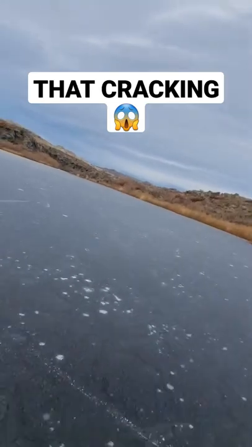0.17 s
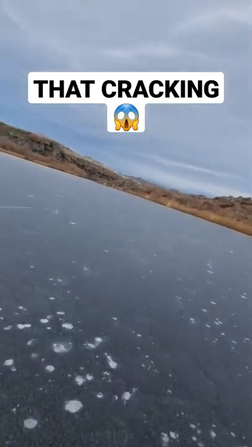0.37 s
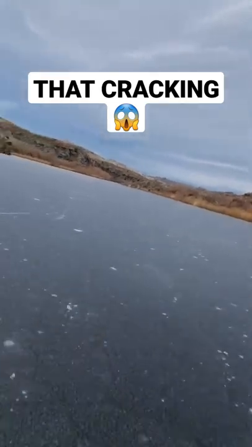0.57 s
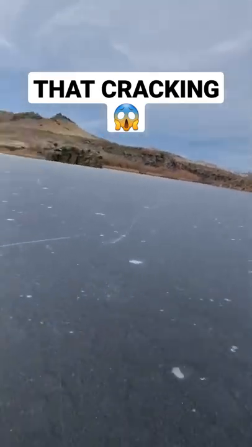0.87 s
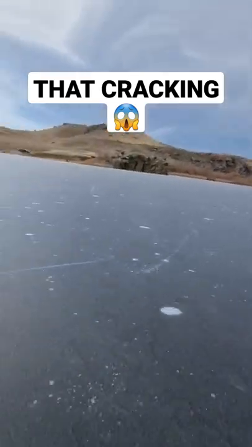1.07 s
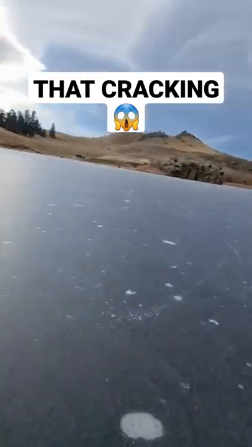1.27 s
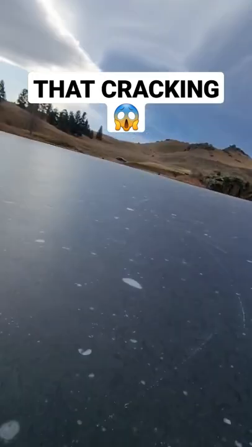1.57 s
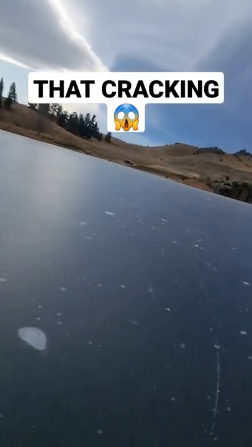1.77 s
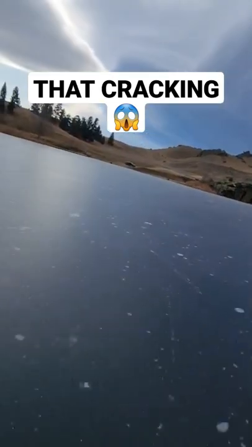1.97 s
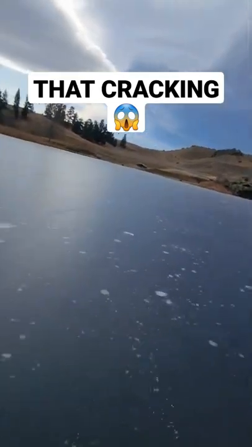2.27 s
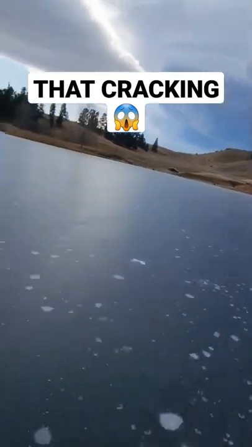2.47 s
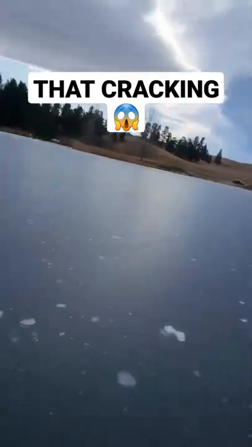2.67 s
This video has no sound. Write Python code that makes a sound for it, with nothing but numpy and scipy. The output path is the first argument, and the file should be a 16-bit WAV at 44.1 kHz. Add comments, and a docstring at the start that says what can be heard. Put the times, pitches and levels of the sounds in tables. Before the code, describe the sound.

Skate blades scrape over thin lake ice, making it rumble, ring and knock. Two sharp cracks come early and another later, followed by a rasping push-off. Low wind gusts hit the close microphone in the open air.

```python
"""Skate blades gliding over thin lake ice, heard in the open from a hand-held stereo microphone.
The blades bump over the surface and set the ice sheet rumbling, ringing and knocking, while their
edges shave off a gritty hiss, sizzle briefly and chatter on the push-offs.
The sheet snaps sharply under the skater and splinters on; wind buffets the two microphone ports."""
import sys
import numpy as np
from scipy import signal
from scipy.fft import rfft, irfft
from scipy.io import wavfile
from scipy.ndimage import map_coordinates

SR = 44100
rng = np.random.default_rng(int(sys.argv[2]) if len(sys.argv) > 2 else 0)


def generate_wav(signal):
    """Clip the signal to [-1, 1] and save it as 16-bit WAV at the path in sys.argv[1]."""
    frames = np.transpose(np.atleast_2d(signal))
    scaled = np.clip(frames, -1, 1) * 32767
    pcm = np.round(scaled).astype(np.int16)
    wavfile.write(sys.argv[1], SR, pcm)


N = 123921
TIME = np.arange(N) / SR
FFT_SIZE = 2 ** 17
HZ = np.maximum(np.arange(FFT_SIZE // 2 + 1) * SR / FFT_SIZE, 1)
GRIT_LAG_S = 0.000311   # scraping and splintering reach the left port this much later

# spectrum of shaved ice: (frequency [Hz], relative level [dB])
SHAVING_SPECTRUM = [(400, -41.5), (1100, -5), (1900, 6.5), (2900, -1.5), (4000, -0.5), (4700, -3),
                    (5900, -1), (7300, 1.5), (8700, -10.5), (10300, -12), (11700, -10.5), (14000, -10.5),
                    (16000, -22)]


def from_db(db):
    """Decibels to gain."""
    return 10 ** (np.asarray(db) / 20)


def unit_power(x):
    """Scale to unit power."""
    return x / np.sqrt(np.mean(x ** 2) + 1e-20)


def in_time(rows):
    """Level columns of a table as gains, sample by sample."""
    times, *columns = np.transpose(rows)
    return [from_db(np.interp(TIME, times, db)) for db in columns]


def per_hz(points):
    """A table of (frequency [Hz], level [dB]) on the frequency grid."""
    hz, db = np.transpose(points)
    return np.interp(np.log(HZ), np.log(hz), db)


def colour(x, db, lag_s=0, sweep_s=0):
    """Causal filter with a delay and the ice's dispersion: lows trail highs, by sweep_s at 1 kHz."""
    cepstrum = irfft(np.log(from_db(db)))
    cepstrum[1:FFT_SIZE // 2] *= 2   # folded for minimum phase
    cepstrum[FFT_SIZE // 2 + 1:] = 0
    turns = HZ * lag_s + 2 * sweep_s * np.sqrt(1000 * HZ)
    return irfft(rfft(x, FFT_SIZE) * np.exp(rfft(cepstrum) - 2j * np.pi * turns))[..., :N]


def high_pass(x, hz, order):
    """Thin out the lows."""
    return signal.sosfilt(signal.butter(order, hz, "high", fs=SR, output="sos"), x)


def ports(pair, db=0, left_lag_s=0):
    """Colour a left-right pair at the microphone; the right port hears more of it."""
    # right port over left port: (frequency [Hz], level [dB])
    right_bias = [(50, 1.5), (120, 11), (250, 5.5), (600, 5.5), (1200, 1.5), (2300, 1), (4200, 8),
                  (8000, 10), (15000, 8.5)]
    bias = per_hz(right_bias) / 2
    return np.array([colour(pair[0], db - bias, left_lag_s), colour(pair[1], db + bias)])


def wander(x, depth_db, low_hz, high_hz, bands):
    """Narrow bands swell and sink, each on its own; unit power."""
    shifts_per_s = 30
    spectrum, out = rfft(x, FFT_SIZE), 0
    place = np.interp(np.log(HZ), np.log([low_hz, high_hz]), [0, bands - 1])
    for k, drift in enumerate(rng.standard_normal((bands, 400))):
        gain = from_db(depth_db * np.interp(TIME * shifts_per_s, np.arange(len(drift)), drift))
        band = irfft(spectrum * np.maximum(1 - np.abs(place - k), 0))[:, :N]
        out += gain * band
    return unit_power(out)


def click(at):
    """A unit click at the given time."""
    return 1.0 * (np.arange(N) == int(at * SR))


def fade(at, decay_s):
    """An envelope that starts at once and dies away."""
    return (TIME >= at) * np.exp(-np.clip((TIME - at) / decay_s, 0, 50))


def tails(clicks, decay_s):
    """Give every click an exponential tail."""
    return signal.lfilter([1], [1, -np.exp(-1 / (decay_s * SR))], clicks + 1e-18)


def contacts(per_s, spread_db):
    """Random clicks, mostly small, a few large."""
    hits = rng.random(N) < per_s / SR
    return hits * from_db(spread_db * np.minimum(rng.exponential(1, N), 4))


def grit(per_s, spread_db, share):
    """Tiny bursts of breaking ice carry a share of the power; the rest is smooth hiss."""
    power = tails(contacts(per_s, spread_db) ** 2, decay_s=0.0015)
    likeness = 0.077   # share of the power common to both ports
    common = np.sqrt(likeness) * rng.standard_normal(N)
    separate = np.sqrt(1 - likeness) * rng.standard_normal((2, N))
    return np.sqrt(1 - share + share * power / power.mean()) * (common + separate)


def shaken_sheet(spectrum, likeness):
    """Bumps under the blades shake the ice sheet; the ports hear them in opposite phase."""
    bumps = unit_power(contacts(per_s=1000, spread_db=3.5) * rng.choice([-1, 1], N))
    opposed = np.sqrt(likeness) * bumps * [[-1], [1]]
    separate = np.sqrt(1 - likeness) * rng.standard_normal((2, N))
    shaking = ports(opposed + separate, per_hz(spectrum))
    return wander(shaking, depth_db=3.5, low_hz=203, high_hz=2150, bands=14)


def rumble():
    """The low, broad sound of the sheet under the gliding blades."""
    # spectrum of the rumbling sheet: (frequency [Hz], relative level [dB])
    spectrum = [(60, -21), (150, -9), (260, -4.5), (400, 0), (600, -3), (800, -6.5), (1100, -15.5),
                (1600, -11.5), (2600, -34), (6000, -73)]
    return shaken_sheet(spectrum, likeness=0.68)


def hollow_ring():
    """The sheet's main resonance shifts as the skater crosses ice of changing thickness."""
    # the resonance before it shifts: (frequency [Hz], relative level [dB])
    spectrum = [(400, -26.5), (750, -2), (950, -1), (1100, 2.5), (1300, 0), (1550, -7), (1900, -21.5),
                (2800, -19), (6000, -51)]
    # path of the resonance: (time [s], centre [Hz])
    ring_pitch = [(0.0, 1098), (0.32, 1165), (0.6, 1082), (1.13, 1167), (1.3, 884), (1.55, 1021),
                  (1.72, 897), (2.05, 1150), (2.75, 1296)]
    unshifted_hz = 1150
    position = np.cumsum(np.interp(TIME, *np.transpose(ring_pitch)) / unshifted_hz)
    ring = shaken_sheet(spectrum, likeness=0.93)
    return np.array([map_coordinates(port, [position], order=3, mode="mirror") for port in ring])


def edge_hiss():
    """The steel edges shave the surface; the colour wanders as the blades move."""
    shavings = grit(per_s=1300, spread_db=3.2, share=0.66)
    hiss = ports(shavings, per_hz(SHAVING_SPECTRUM), GRIT_LAG_S)
    return wander(hiss, depth_db=3, low_hz=1760, high_hz=14100, bands=20)


def wind():
    """Lumpy low turbulence, separate at each port; single eddies swell and sink."""
    # gusts on the microphone: (time [s], relative level [dB])
    gusts = [(0.0, -38), (0.23, -36.5), (0.3, -26), (0.37, -38.5), (0.74, -32.5), (0.93, -37.5),
             (1.04, -34.5), (1.11, -37), (1.18, -33), (1.26, -36.5), (1.6, -34.5), (1.82, -29), (1.88, -36),
             (2.09, -26), (2.16, -32), (2.27, -27.5), (2.37, -32.5), (2.47, -32.5), (2.66, -36.5),
             (2.72, -28.5), (2.81, -36.5)]
    # spectrum of the buffeting: (frequency [Hz], relative level [dB])
    spectrum = [(15, -9), (32, -12), (48, -1), (72, -0.5), (100, -5.5), (160, -12.5), (300, -18),
                (1000, -71.5)]
    strength, = in_time(gusts)
    turbulence = ports(rng.standard_normal((2, N)), per_hz(spectrum))
    return from_db(1.5) * strength * wander(turbulence, depth_db=1, low_hz=80, high_hz=216, bands=3)


def cracks():
    """Each crack is a sharp, dispersed snap and a thin crunch in a short spray of splinters."""
    # the sheet breaks: (time [s], relative snap level [dB], splinter level [dB],
    # snap's low edge [Hz], snap's extra level on the right [dB])
    breaks = [(0.1442, -11, -43, 2520, 0), (0.1482, 3.5, -27, 447, -2), (0.2205, -13.5, -42, 1500, 3.5),
              (0.8006, -27, -40.5, 4000, 4.5), (0.8507, 6, -26.5, 361.4, -4.5),
              (1.1653, -17.5, -57, 1500, -10), (1.8861, -11, -41.5, 3000, 4), (1.891, -1.5, -27.5, 766, 1),
              (1.955, -18, -32, 2997, 1), (2.1395, -21, -52, 5000, 8), (2.1757, -12, -32, 3600, 8.5),
              (2.3672, -17, -46, 5000, 13), (2.4703, -19.5, -39, 4956, 3)]
    # the snap at each port: (frequency [Hz], gain [dB])
    left_spectrum = [(80, -40), (250, -29), (700, -5), (1200, 4.5), (1750, 4), (2600, -0.5), (4000, 4),
                     (7000, -22), (9500, -14), (15000, -26)]
    right_spectrum = [(80, -23), (250, -12), (600, -3), (1100, -1.5), (1700, 3), (2700, -2), (4100, 1),
                      (5200, 2.5), (7000, 2.5), (10000, -3.5), (15000, -11)]
    sweep_s, spray_rise_s, spray_decay_s = 0.000733, 0.0056, 0.046
    snaps, spray = np.zeros((2, N)), 0
    crunch = from_db(-23.5) * high_pass(rng.standard_normal((2, N)), hz=2010, order=1)
    for at, snap_db, splinter_db, low_hz, right_db in breaks:
        burst = click(at) + fade(at, decay_s=0.0036) * crunch
        port_gains = from_db(snap_db + 9.5 + np.array([[0], [right_db]]))
        snaps += port_gains * high_pass(burst, low_hz, order=2)
        falloff = np.maximum((at - TIME) / spray_rise_s, (TIME - at) / spray_decay_s)
        spray += from_db(splinter_db) * np.exp(-np.clip(falloff, 0, 50))
    left = colour(snaps[0], per_hz(left_spectrum), lag_s=0.000443, sweep_s=sweep_s)
    right = colour(snaps[1], per_hz(right_spectrum), sweep_s=sweep_s)
    brighter = per_hz(SHAVING_SPECTRUM) + 2 * np.log2(HZ)   # tilted up 2 dB per octave
    splinters = ports(grit(per_s=900, spread_db=2, share=0.45), brighter, GRIT_LAG_S)
    splinters = wander(splinters, depth_db=3, low_hz=2040, high_hz=34000, bands=8)
    return np.array([left, right]) + spray * splinters


def sizzles():
    """Friction briefly picks out one resonance of the steel."""
    # blade resonances: (middle [s], half length [s], pitch [Hz], relative level [dB])
    resonances = [(.2, 0.044, 5300, -35.5), (0.35, 0.043, 7040, -43), (1.125, 0.13, 7320, -39),
                  (1.135, .07, 11700, -47), (1.547, 0.015, 4000, -38.5), (1.547, 0.012, 6500, -36),
                  (1.705, 0.076, 6800, -44), (2.012, .06, 13700, -41), (2.699, 0.14, 5620, -42),
                  (2.74, 0.084, 7450, -40.5)]
    width_hz, out = 260, 0
    for middle, half_length, hz, db in resonances:
        resonator = signal.iirpeak(hz, hz / width_hz, fs=SR)
        tone = unit_power(signal.lfilter(*resonator, rng.standard_normal((2, N))))
        swell = np.exp(-((TIME - middle) / half_length) ** 2)
        out += from_db(db) * swell * tone
    return ports(out, db=-6.5)


def knocks():
    """A blade hits a larger bump: a short hollow pulse that falls in pitch and scatters in the sheet."""
    # blows on the sheet: (time [s], relative level [dB], pitch [Hz], scatter decay [s],
    # left gain [ratio, negative = opposite phase])
    blows = [(.296, -15, 1100, 0.01, -1.3), (0.291, -23.5, 133, 0.018, 0.62),
             (.533, -13.5, 443, 0.016, -0.25), (.535, -19, 905, 0.018, -1.3),
             (.611, -18, 462, 0.027, -0.36), (1.119, -8, 566.7, 0.011, -0.84),
             (1.305, -18.5, 780, 0.026, 0.67), (1.428, -18, 360, 0.0046, 0.14),
             (1.447, -21, 683, 0.014, 0.35), (1.534, -15.5, 408, 0.027, 0.53),
             (1.550, -6, 970, 0.015, -0.59), (1.639, -12.5, 864, .014, 1.73),
             (1.667, -17.5, 900, 0.078, 1.96), (1.929, -21, 171.2, 0.02, 0.64),
             (2.258, -17.5, 189.5, 0.018, 0.059), (2.326, -12, 960, 0.0066, -1.5),
             (2.479, -11.5, 946, 0.006, -0.67)]
    width_octaves, skirt_db = 0.67, 8.5
    out = np.zeros((2, N))
    for at, db, hz, decay_s, left_gain in blows:
        scatter = from_db(-23.5) * fade(at, decay_s) * rng.standard_normal(N)
        octaves = np.log2(HZ / hz)
        peak_db = -20 * np.log10(1 + (octaves / width_octaves) ** 2) - skirt_db * octaves ** 2
        pulse = colour(click(at) + scatter, np.maximum(peak_db, -80), sweep_s=0.000657)
        out += from_db(db) * pulse / np.abs(pulse).max() * [[left_gain], [1]]
    return ports(out, db=-4, left_lag_s=0.0001)


def chatter():
    """On the push-off the loaded edge sticks and slips in a fast, nearly regular run of bright rasps."""
    # push-offs: (start [s], end [s], level [dB], slip rate [1/s])
    pushes = [(1.14, 1.202, -40.5, 90), (1.96, 2.054, -36.5, 110), (2.215, 2.382, -32, 160)]
    # spectrum of a slip: (frequency [Hz], relative level [dB])
    spectrum = [(800, -36), (2700, 0), (3700, -10), (5300, -3), (7500, 0.5), (8800, -12), (13800, -11),
                (16000, -22)]
    jitter, spread_db, out = 0.25, 2.5, 0
    for start, end, db, rate in pushes:
        gap, size = rng.standard_normal((2, 60))
        times = start + np.cumsum(np.exp(jitter * gap)) / rate
        inside = times < end
        slips = np.zeros(N)
        slips[(times[inside] * SR).astype(int)] = from_db(spread_db * size[inside])
        friction = rng.standard_normal(N) + rng.standard_normal((2, N))
        rasp = ports(tails(slips, decay_s=0.0007) * friction, per_hz(spectrum), GRIT_LAG_S)
        time_share = (end - start) * SR / N   # so the level holds over the push alone
        out += from_db(db) * np.sqrt(time_share) * unit_power(rasp)
    return out


def scene():
    """Blades, ice and wind together at the microphone."""
    # relative levels of the glide: (time [s], rumble [dB], hollow ring [dB], edge hiss [dB])
    glide = [(0.0, -33.5, -29, -47), (0.13, -32, -31, -48.5), (0.25, -36.5, -34, -43),
             (0.32, -34, -29.5, -40), (0.39, -35.5, -37, -50), (0.49, -34, -30, -51.5),
             (0.54, -27, -32, -43), (0.62, -30.5, -22, -39.5), (0.68, -35, -36, -45),
             (0.75, -32, -29, -43.5), (0.83, -31, -31, -48), (0.92, -27.5, -26.5, -37.5),
             (1.02, -26.5, -22.5, -38), (1.12, -28.5, -18, -34), (1.19, -26.5, -19, -37.5),
             (1.22, -33.5, -26.5, -45.5), (1.39, -36, -30.5, -45), (1.5, -26, -29, -43.5),
             (1.535, -25, -20.5, -36), (1.563, -25.5, -26, -36), (1.585, -30, -21, -47.5),
             (1.68, -30.5, -22, -41), (1.86, -32.5, -25, -51), (1.92, -28.5, -22.5, -54),
             (2.02, -31.5, -21.5, -35), (2.07, -34.5, -23.5, -37), (2.17, -29.5, -26.5, -38.5),
             (2.24, -27, -41, -32.5), (2.33, -24, -25.5, -30.5), (2.375, -28, -31, -32),
             (2.41, -33, -29, -39), (2.56, -30, -26, -40), (2.73, -30, -22.5, -34.5),
             (2.81, -32, -25.5, -38.5)]
    rumble_gain, ring_gain, hiss_gain = in_time(glide)
    blades = from_db(1) * rumble_gain * rumble()
    blades += from_db(-5) * ring_gain * hollow_ring()
    blades += from_db(1.5) * hiss_gain * edge_hiss()
    return blades + chatter() + sizzles() + knocks() + cracks() + wind()


def record(dry):
    """The loudest snaps are rounded off and the top is cut at 15.5 kHz."""
    rounded = dry / (1 + dry ** 4) ** .25
    return signal.sosfilt(signal.ellip(10, .2, 80, 15500, fs=SR, output="sos"), rounded)


dry = scene()
out = record(dry)
generate_wav(out)
```